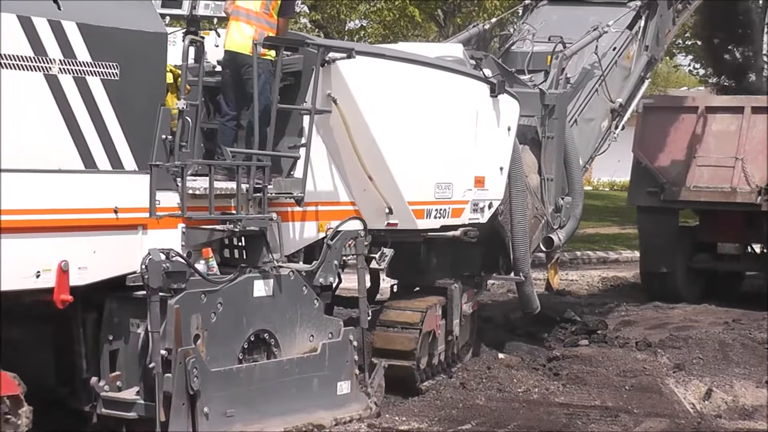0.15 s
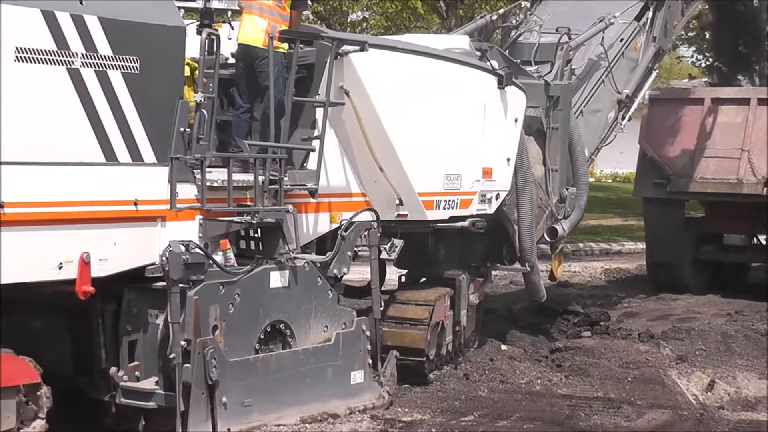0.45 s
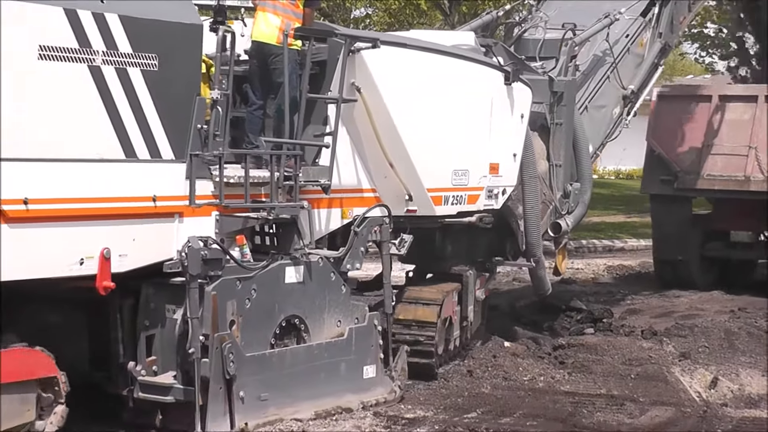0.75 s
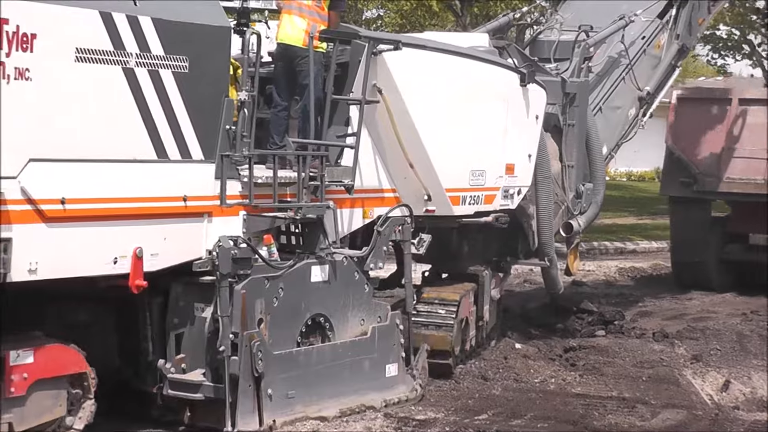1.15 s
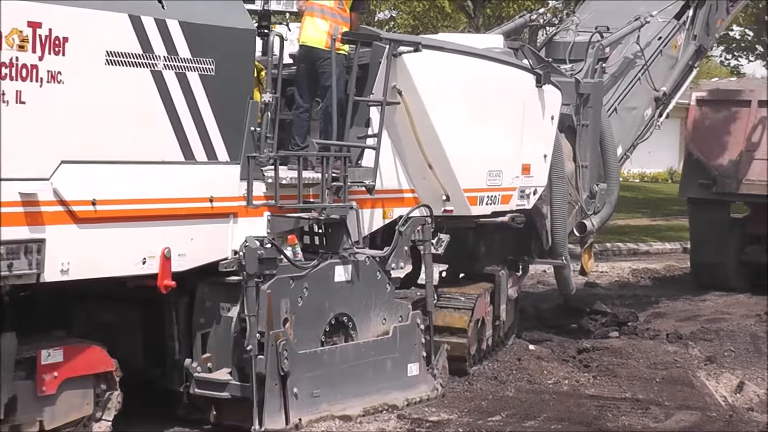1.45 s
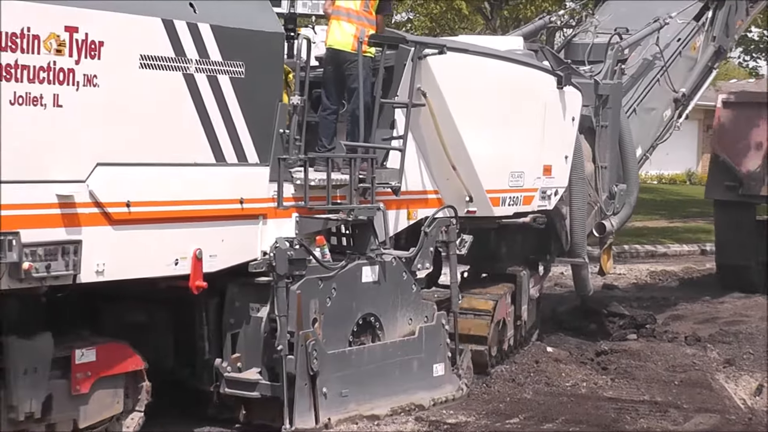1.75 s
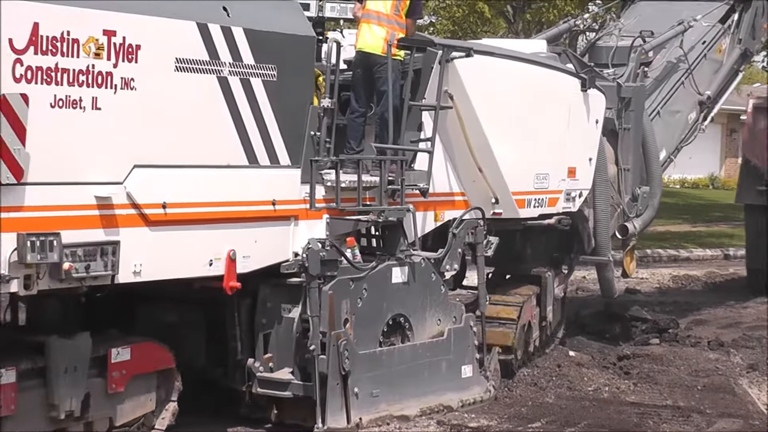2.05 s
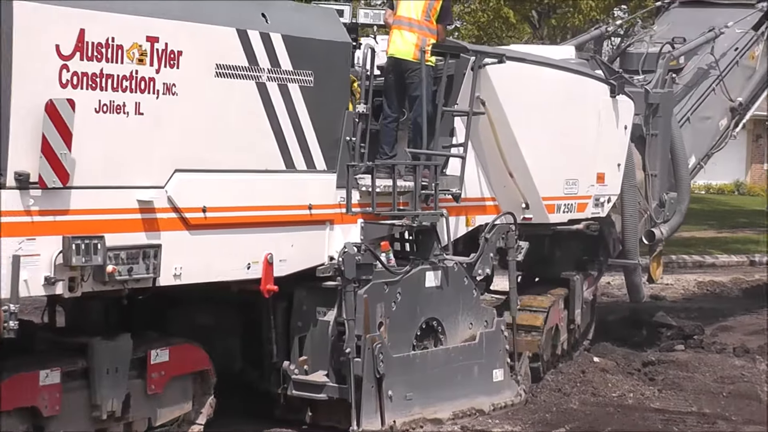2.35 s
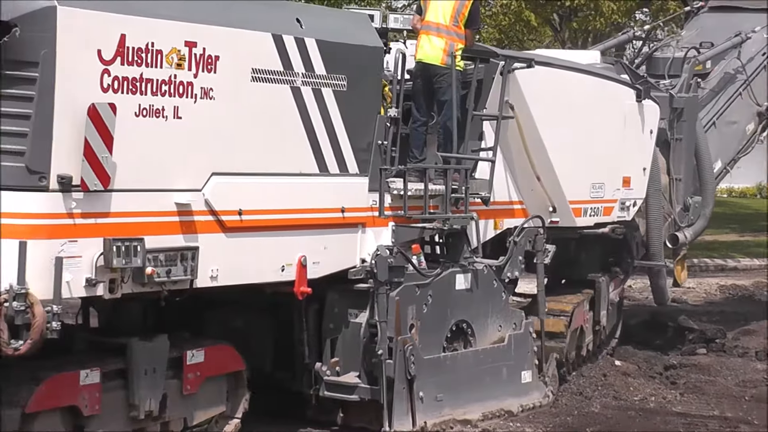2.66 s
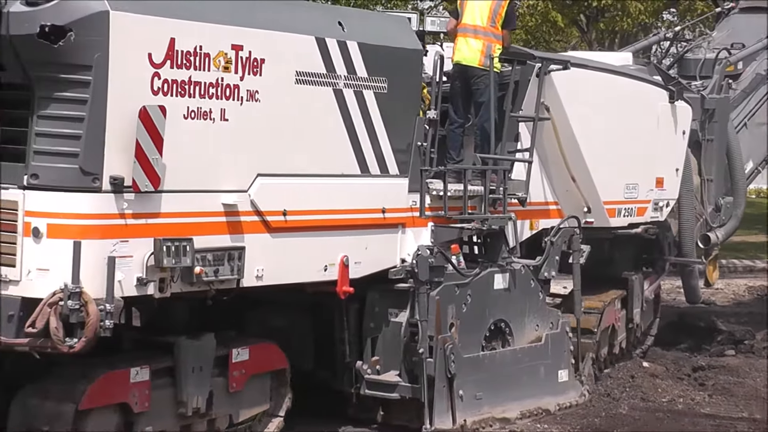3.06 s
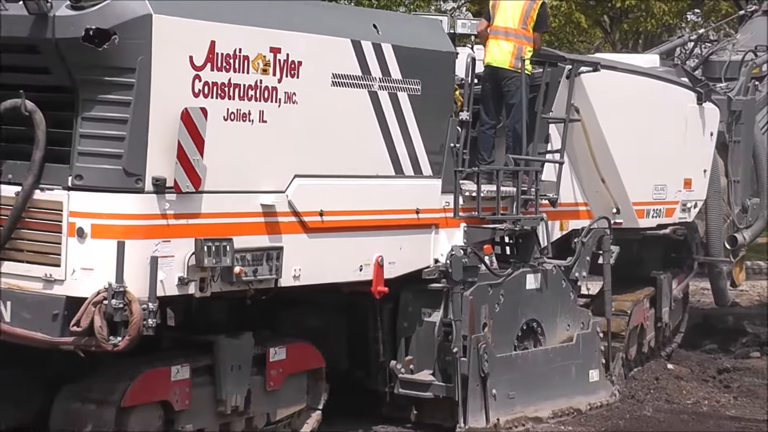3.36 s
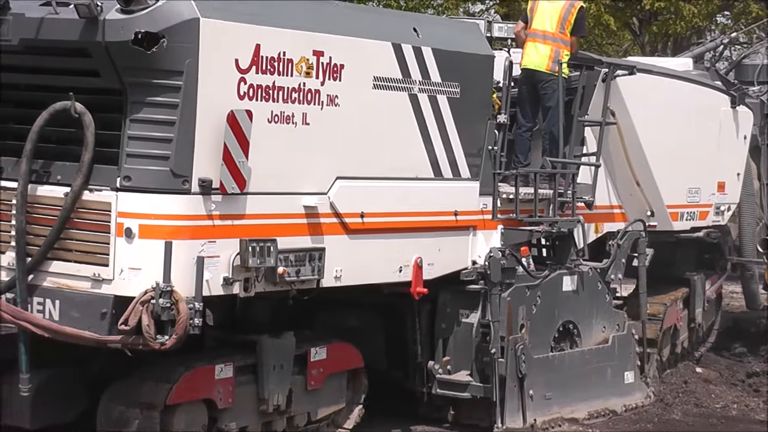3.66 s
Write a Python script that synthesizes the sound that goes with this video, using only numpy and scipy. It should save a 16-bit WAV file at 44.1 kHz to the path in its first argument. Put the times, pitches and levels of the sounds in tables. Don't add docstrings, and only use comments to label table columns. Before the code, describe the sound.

A tracked road milling machine rumbles steadily past while its tracks squeal and clank at close range.

```python
import sys
import numpy as np
from scipy import signal
from scipy.fft import rfft, irfft
from scipy.io import wavfile

SR = 44100
rng = np.random.default_rng(int(sys.argv[2]) if len(sys.argv) > 2 else 0)


def generate_wav(sig):
    pcm = np.round(np.clip(np.atleast_2d(sig).T, -1, 1) * 32767).astype(np.int16)
    wavfile.write(sys.argv[1], SR, pcm)


def to_linear_factor(level_db):
    exponent = np.asarray(level_db, float) / 20
    return 10 ** exponent


N = 167139

# time_s, level_db
LOUDNESS = [(0, -16.5), (.8, -16), (1.38, -14.5), (2.0, -15), (2.27, -17), (2.5, -16.5), (2.9, -16),
            (3.3, -16), (3.43, -17.5), (3.46, -19), (3.66, -20.5), (3.76, -18.5)]
# frequency_hz, density_db
ROAR_SPECTRUM = [(20, -46), (128, 2), (269, -2.5), (419, -5.5), (539, -1.5), (717, -4.5), (867, -12.5),
                 (1400, -28)]
# frequency_hz, density_db
CLATTER_SPECTRUM = [(600, -16.5), (1000, -0.5), (2750, -7.5), (2950, -10.5), (7680, -21.5), (9100, -24.5),
                    (9520, -31.5), (15700, -49.5)]
# frequency_hz, width_hz, level_db
HOUSING_MODES = [
    (139, 22, -1),
    (169, 37, -5),
    (260, 21, 14.5),
    (555, 120, 5),
    (705, 16, 11),
]
# time_s, pitch_hz, level_db
PUMP_WHINE = [(0, 2412, -39), (.9, 2402, -36), (1.4, 2378, -33), (1.9, 2400, -39), (2.05, 2400, -43),
              (2.7, 2414, -37), (3.2, 2410, -48), (3.79, 2410, -52)]
# start_s, length_s, first_hz, last_hz, level_db
ROLLER_SQUEALS = [(.025, .279, 9013, 8874, -41), (.364, .04, 9040, 9082, -37), (.404, .17, 8909, 8950, -38),
                  (.449, .04, 8253, 8163, -35), (.773, .115, 9180, 9170, -43), (.893, .18, 8945, 8942, -43),
                  (1.08, .03, 8420, 8400, -39), (1.16, .09, 9220, 9170, -46), (1.25, .12, 8880, 8790, -43),
                  (1.73, .12, 8820, 8890, -42), (2.165, .24, 8840, 8900, -43), (2.27, .06, 9200, 9120, -44),
                  (2.36, .05, 9000, 9050, -43), (2.56, .4, 8870, 8920, -43), (2.968, .13, 8883, 8926, -40),
                  (3.115, .14, 8570, 8360, -42)]
# start_s, length_s, first_hz, last_hz, level_db
IDLER_SQUEALS = [(.57, .15, 10630, 10770, -51), (.624, .12, 10976, 11057, -50),
                 (.913, .22, 10270, 10780, -47), (1.337, .27, 10150, 10300, -42),
                 (2.33, .1, 10750, 10600, -53), (2.44, .12, 10100, 10150, -53),
                 (2.58, .08, 10600, 10450, -53), (2.704, .16, 10290, 10190, -49),
                 (2.91, .16, 10230, 10220, -49), (3.075, .16, 11000, 10868, -47),
                 (3.33, .085, 10290, 10190, -49), (3.37, .1, 10800, 10450, -49),
                 (3.715, .075, 10550, 10850, -48)]
# start_s, peak_db
CLANKS = [(0.0692, -20), (0.3103, -14), (2.0103, -14), (2.0647, -18), (2.145, -26), (2.4926, -21),
          (2.719, -33), (3.109, -11), (3.1507, -18), (3.1921, -24), (3.2276, -16), (3.3528, -14),
          (3.378, -17), (3.4181, -19), (3.44, -16), (3.4615, -20), (3.601, -18), (3.6227, -19), (3.71, -18),
          (3.7273, -16)]
# frequency_hz, level_db, t60_s
LINK_MODES = [(4160, -11, .012), (6370, -7, 0.011), (7130, -7, 0.015), (7550, -5, .012),
              (7960, -10.5, 0.015), (8600, -12, .007), (9900, -13, .006)]
# start_s, length_s, level_db
SCRAPES = [
    (1.40, 0.04, -25),
    (1.808, 0.035, -23),
    (2.488, 0.013, -29),
]
# start_s,
# length_s, first_hz, last_hz, level_db
PIN_SQUEALS = [(.343, .03, 5250, 5450, -20), (.372, .1, 5400, 5400, -29),
               (.533, .047, 5230, 5250, -14), (.578, .06, 5340, 5350, -25),
               (.635, .042, 5370, 5390, -22), (.676, .028, 5390, 5400, -16),
               (.71, .06, 5390, 5370, -25), (.755, .02, 5300, 5200, -28),
               (.87, .057, 5330, 5250, -20), (.915, .045, 5130, 5140, -17.5),
               (.963, .022, 5170, 5260, -20), (1.02, .045, 5250, 5290, -25),
               (1.06, .047, 5340, 5370, -23), (1.11, .057, 5390, 5410, -24),
               (1.4, .052, 4840, 4870, -19.5), (1.55, .047, 5260, 5250, -21.5),
               (1.6, .05, 5250, 5240, -26), (1.728, .042, 5130, 5170, -16),
               (1.765, .025, 5210, 5260, -22), (1.818, .03, 4760, 4900, -24),
               (1.916, .03, 5300, 5290, -22), (1.96, .04, 5310, 5270, -29),
               (2.01, .04, 5260, 5250, -26.5), (2.055, .03, 5240, 5270, -31),
               (2.288, .075, 3400, 3440, -33), (2.365, .06, 3450, 3480, -36),
               (2.328, .052, 5350, 5330, -27), (2.39, .05, 5350, 5250, -31),
               (2.407, .03, 5150, 5120, -21), (2.44, .04, 5030, 5050, -27),
               (2.476, .044, 5050, 5080, -19), (2.52, .04, 5080, 5100, -27),
               (2.491, .018, 3690, 3660, -24), (2.489, .01, 4000, 3900, -25),
               (2.573, .032, 5250, 5240, -21.5), (2.6, .03, 5530, 5580, -30),
                    (2.635, .03, 5480, 5600, -30), (2.675, .06, 5180, 5150, -29),
                    (2.8, .055, 5090, 5070, -24), (2.825, .025, 5330, 5340, -29),
                    (2.845, .085, 5190, 5330, -27), (2.945, .027, 5180, 5190, -21),
                    (2.958, .045, 5040, 5030, -25), (2.975, .06, 5200, 5270, -25),
                    (3.0, .03, 5430, 5470, -30), (3.04, .09, 5510, 5490, -29),
                    (3.135, .105, 5490, 5450, -28), (3.141, .027, 5340, 5300, -23),
                    (3.205, .055, 5280, 5310, -26), (3.255, .04, 5020, 5020, -27),
                    (3.29, .035, 5110, 5130, -23), (3.25, .045, 5870, 5830, -32),
                    (3.31, .095, 5850, 5810, -28), (3.335, .04, 5340, 5400, -29),
                    (3.374, .03, 5400, 5400, -20), (3.4, .11, 5370, 5240, -26),
                    (3.44, .085, 5050, 5170, -33), (3.58, .025, 5420, 5420, -31),
                    (3.59, .085, 5110, 5150, -29), (3.62, .07, 5410, 5430, -33),
                    (3.64, .055, 5880, 5810, -35), (3.676, .046, 5250, 5280, -19.5),
                    (3.69, .06, 5470, 5510, -29), (3.735, .06, 5320, 5400, -25),
                    (3.755, .035, 5520, 5560, -30), (3.73, .06, 5800, 5880, -36)]
# start_s, peak_db, pitch_hz
PAD_THUDS = [
    (3.345, -7, 172),
    (3.424, -5, 740),
    (3.4303, -5, 560),
    (3.72, -12.5, 119),
]
# frequency_hz, difference_db
SIDE_TILT = [(60, 2.5), (350, -1.8), (1800, 2.5), (4500, -1.1), (8000, 1.5), (13000, 3)]
# frequency_hz, phase_rad
SIDE_LEAD = [(60, -0.5), (260, -.3), (900, 0.33), (3190, -0.46), (6370, 0.41), (12000, -0.4)]
# frequency_hz, level_db
SIDE_APART = [(25, -10), (100, -28), (1500, -13), (5000, -35), (8000, -9), (14000, -14)]

ROAR_DB, CLATTER_DB, BASS_SWING = 1.5, -4.5, 1.34
FIRING_HZ, FIRING_JITTER, FIRING_SPREAD_DB, FIRING_DB = 68.67, 0.062, 0.5, -15.5
SINGING_HZ, SINGING_T60_S, SINGING_DB = 4950, 0.0037, -17.5
SECOND_WHINE_HZ, SECOND_WHINE_DB, SECOND_WHINE_END_S = 2544, -44, 3.35
GRIP_S, SLIP_S, FADE_DB, SWELL_DB, STRAND_HZ = .009, .009, 2.5, 1.5, 171.4
CLANK_DB, RATTLE_S, TICKS_PER_S, TICK_DB = -4.5, 0.014, 57, -27.5
TOUCHES_PER_S, GRIT_DB = 900, -7.0
THUD_CYCLES = 11.5
MIC_CEILING = 1.5


def rms_one(x):
    return x / np.sqrt(np.mean(x ** 2) + 1e-20)


def in_time(rows):
    s, *columns = np.transpose(rows)
    return [np.interp(np.arange(N) / SR, s, c) for c in columns]


def at_hz(points, hz):
    p = np.array(points, float)
    return np.interp(np.log(np.maximum(hz, 1)), np.log(np.maximum(p[:, 0], 1)), p[:, 1])


def drift(rate_hz, size=N):
    r = np.exp(-2 * np.pi * rate_hz * 8 / SR)
    noise = rng.standard_normal(size // 8 + 4002)
    slow = signal.lfilter([1], [1, -2 * r, r * r], noise)[4000:]
    return np.interp(np.arange(size) / 8, np.arange(len(slow)), slow / slow.std())


def ring(clicks, hz, t60):
    r = to_linear_factor(-60 / (max(t60, .002) * SR))
    w = 2 * np.pi * hz / SR
    return signal.lfilter([0, np.sin(w)], [1, -2 * r * np.cos(w), r * r], clicks + 1e-18)


def flickering_noise(spectrum, patchy_db, together_db):
    hz = np.fft.rfftfreq(N, 1 / SR)
    inside = (hz > spectrum[0][0]) & (hz < spectrum[-1][0])
    shaped = rfft(rng.standard_normal((2, N))) * to_linear_factor(at_hz(spectrum, hz)) * inside
    shaped[1] *= to_linear_factor(at_hz(SIDE_APART, hz))
    place = 2 * np.log2(np.maximum(hz, 1))
    together = together_db * drift(6.4)
    out = 0
    for k in range(int(place[inside][0]), int(place[inside][-1]) + 2):
        band = np.clip(1 - np.abs(place - k), 0, 1)
        out = out + irfft(shaped * band, N) * to_linear_factor(together + patchy_db * drift(9.5))
    return out / np.sqrt(np.mean(out[0] ** 2))


def engine_firing():
    count = int(N / SR * FIRING_HZ)
    uneven = rng.standard_normal((count, 2))
    at = (np.arange(count) + .5 + FIRING_JITTER * uneven[:, 0]) / FIRING_HZ * SR
    clicks = np.zeros(N)
    clicks[np.clip(at.astype(int), 0, N - 1)] = to_linear_factor(FIRING_SPREAD_DB * uneven[:, 1])
    rung = sum(to_linear_factor(db) * rms_one(ring(clicks, hz, 1.45 / wide)) for hz, wide, db in HOUSING_MODES)
    return rms_one(signal.sosfilt(signal.butter(4, 110, "high", fs=SR, output="sos"), rung))


def singing_pins():
    sung = rms_one(ring(rng.standard_normal(N), SINGING_HZ, SINGING_T60_S))
    return sung * to_linear_factor(SINGING_DB + 2.2 * drift(14.0))


def machine_bed():
    loud_db, = in_time(LOUDNESS)
    bed = to_linear_factor(ROAR_DB) * flickering_noise(ROAR_SPECTRUM, patchy_db=0.13, together_db=0.89)
    bed[0] += to_linear_factor(FIRING_DB) * engine_firing()
    bed *= to_linear_factor((BASS_SWING - 1) * (loud_db - loud_db.mean()))
    bed += to_linear_factor(CLATTER_DB) * flickering_noise(CLATTER_SPECTRUM, patchy_db=0.74, together_db=1.31)
    bed[0] += singing_pins()
    return to_linear_factor(loud_db) * bed


def pump_whine():
    hz, db = in_time(PUMP_WHINE)
    first_turn = 2 * np.pi * np.cumsum(hz + 3.0 * drift(8.0)) / SR
    first = to_linear_factor(db + 2.0 * drift(9.0)) * np.sin(first_turn)
    second_turn = 2 * np.pi * np.cumsum(SECOND_WHINE_HZ + 8.0 * drift(4.0)) / SR
    second = to_linear_factor(SECOND_WHINE_DB + 4.0 * drift(4.0)) * np.sin(second_turn)
    running = np.arange(N) < SECOND_WHINE_END_S * SR
    return np.sqrt(2) * (first + second * running)


def squeals(rows, flutter_db, waver_hz, haze_db, strand_db):
    size = N + SR
    out = np.zeros(size)
    flutter = flutter_db * (drift(42.0, size) + 0.28 * drift(16.0, size))
    waver = waver_hz * drift(30.0, size)
    haze = to_linear_factor(haze_db) * drift(280.0, size)
    strand = to_linear_factor(strand_db + 2 * flutter[::-1])
    before, last_turn = 0, [0]
    for (s, length, first_hz, last_hz, db), apart in zip(rows, rng.uniform(-1.1, 1, len(rows))):
        i = int(s * SR)
        t = np.arange(int((length + 6 * SLIP_S) * SR)) / SR
        part = slice(i, i + len(t))
        swell = SWELL_DB * (np.sin(np.pi * np.minimum(t / length, 1)) - 1)
        level_db = db + FADE_DB * (.5 - t / length) + swell
        let_go = np.exp(-np.maximum(t - length + SLIP_S, 0) / SLIP_S)
        shape = np.minimum(t / GRIP_S, 1) * let_go * to_linear_factor(level_db)
        hz = first_hz + (last_hz - first_hz) * t / length + waver[part] - waver[part].mean()
        turn = 2 * np.pi * np.cumsum(hz) / SR
        turn += last_turn[min(max(i - before, 0), len(last_turn) - 1)]
        before, last_turn = i, turn
        note = (to_linear_factor(flutter[part] - flutter[part].mean()) + haze[part]) * np.sin(turn)
        strand_hz = STRAND_HZ * (apart + np.sign(apart)) / 2
        note += strand[part] * np.sin(turn + 2 * np.pi * strand_hz * t)
        out[part] += np.sqrt(2) * shape * note
    return out[:N]


def link_clanks():
    s, db = np.transpose(CLANKS)
    lag = rng.random((len(s), 6)) * RATTLE_S * [0, 1, 1, 1, 1, 1]
    at = ((s[:, None] + lag) * SR).astype(int)
    ticks = (rng.random(N) < TICKS_PER_S / SR) * to_linear_factor(TICK_DB)
    t, drag, out = np.arange(N) / SR, 0, 0
    for start, length, drag_db in SCRAPES:
        rise = (t - start) / .004
        fall = (start + length - t) / 0.0063 + 1
        drag = drag + to_linear_factor(drag_db) * np.clip(np.minimum(rise, fall), 0, 1)
    for hz, level_db, t60 in LINK_MODES:
        touches = drag * (rng.random(N) < TOUCHES_PER_S / SR)
        clicks = (ticks + touches) * rng.standard_normal(N)
        mood_db = rng.normal(0, 4, (len(s), 1))
        hit = to_linear_factor(db[:, None] + CLANK_DB + mood_db - 4.6 * lag / RATTLE_S)
        np.add.at(clicks, at, hit * rng.choice([-1, 1], lag.shape))
        out = out + to_linear_factor(level_db) * ring(clicks, hz, t60)
    grit = to_linear_factor(GRIT_DB) * drag * rng.standard_normal(N) * to_linear_factor(5.8 * drift(300.0))
    out = signal.sosfilt(signal.butter(4, 9500, "low", fs=SR, output="sos"), out)
    return out + signal.sosfilt(signal.butter(2, [7000, 11000], "band", fs=SR, output="sos"), grit)


def pad_thuds():
    out = np.zeros(N)
    for s, db, hz in PAD_THUDS:
        push = np.zeros(N)
        i, size = int(s * SR), int(2.6 / hz * SR)
        push[i:i + size] = np.sin(2 * np.pi * hz * np.arange(size) / SR)[:N - i]
        knock = ring(push, hz, THUD_CYCLES / hz)
        out += to_linear_factor(db) * knock / np.abs(knock).max()
    return out


def microphone_pair(common, apart):
    hz = np.fft.rfftfreq(N, 1 / SR)
    port = to_linear_factor(at_hz(SIDE_TILT, hz) / 2) * np.exp(.5j * at_hz(SIDE_LEAD, hz))
    spectrum = rfft(common)
    return np.array([irfft(spectrum * port, N) + apart, irfft(spectrum / port, N) - apart])


def scene():
    common, apart = machine_bed()
    common = common + pump_whine()
    common += squeals(ROLLER_SQUEALS + IDLER_SQUEALS, flutter_db=3.0, waver_hz=30.0, haze_db=-26.0, strand_db=-20.0)
    common += link_clanks()
    pins = PIN_SQUEALS
    common += squeals(pins, flutter_db=2.2, waver_hz=16.0, haze_db=-14.0, strand_db=-19.0)
    common += pad_thuds()
    return microphone_pair(common, apart)


def roll_off(x):
    return signal.sosfilt(signal.butter(12, 15660, fs=SR, output="sos"), x)


def record(dry):
    mix = MIC_CEILING * np.tanh(dry / MIC_CEILING)
    return roll_off(mix)


dry = scene()
out = record(dry)
generate_wav(out)
```